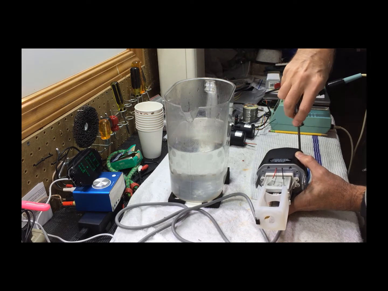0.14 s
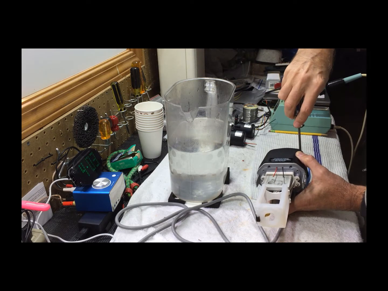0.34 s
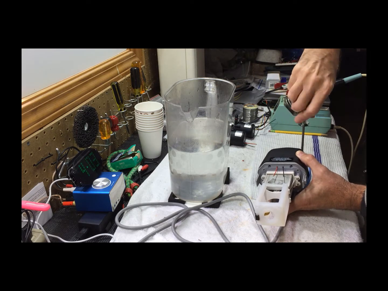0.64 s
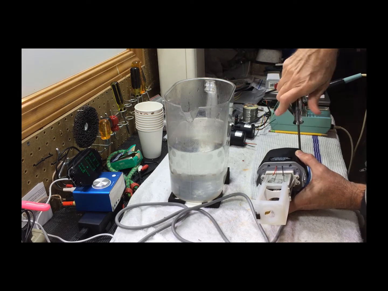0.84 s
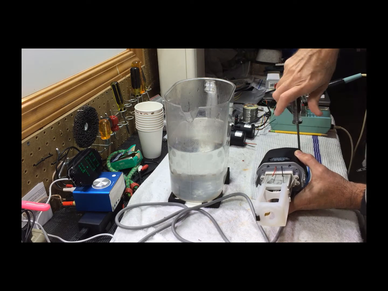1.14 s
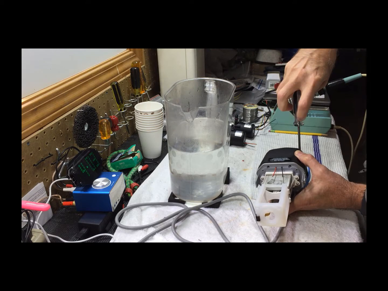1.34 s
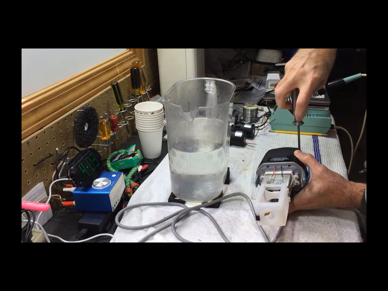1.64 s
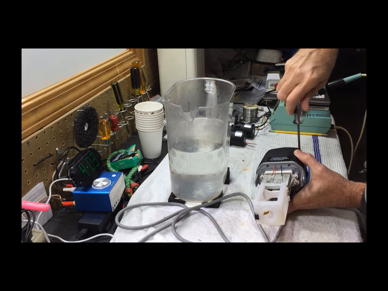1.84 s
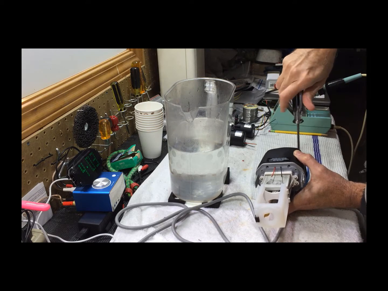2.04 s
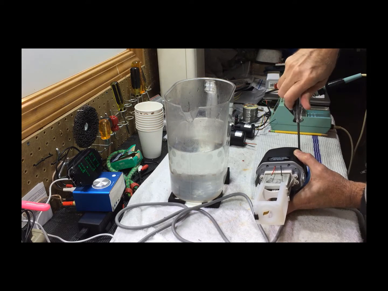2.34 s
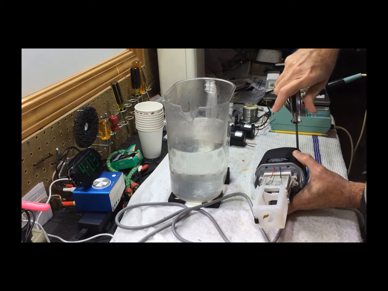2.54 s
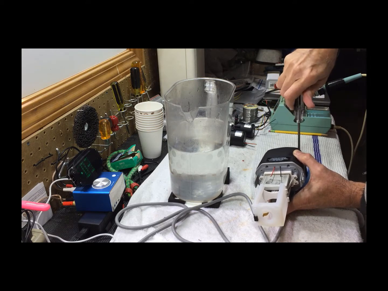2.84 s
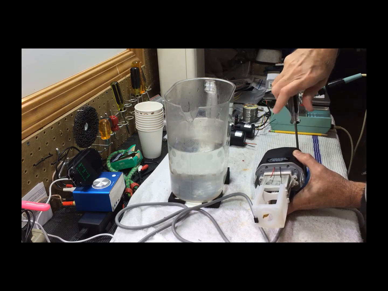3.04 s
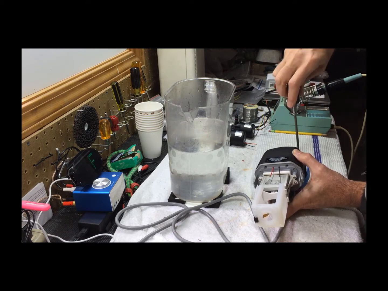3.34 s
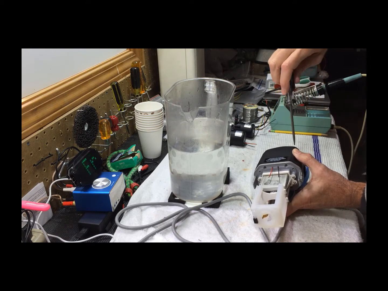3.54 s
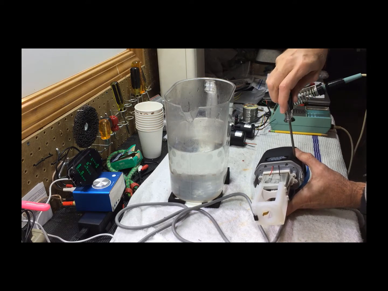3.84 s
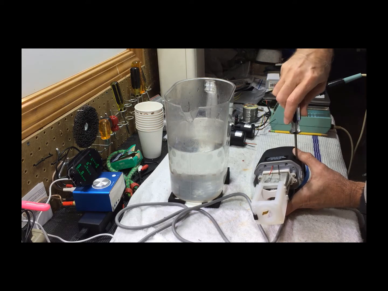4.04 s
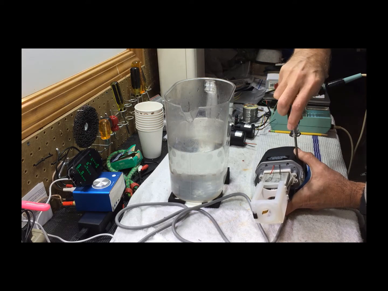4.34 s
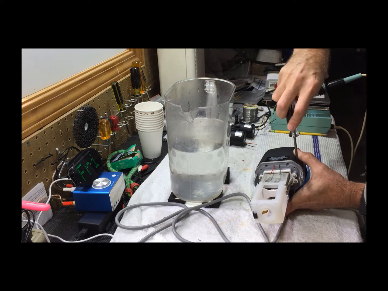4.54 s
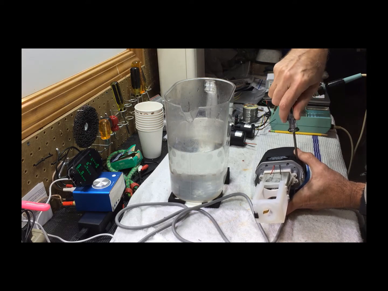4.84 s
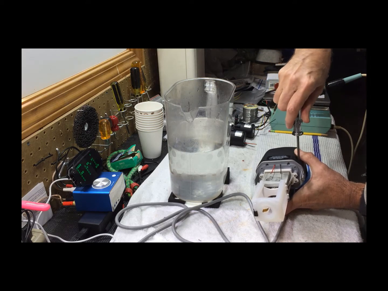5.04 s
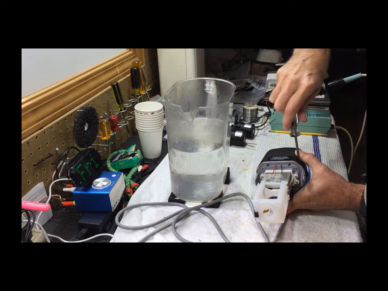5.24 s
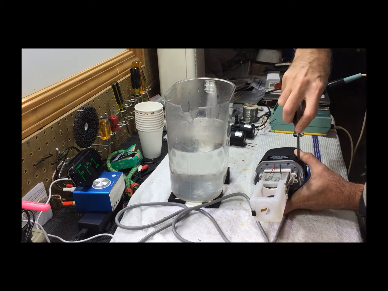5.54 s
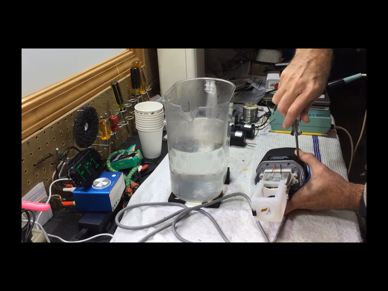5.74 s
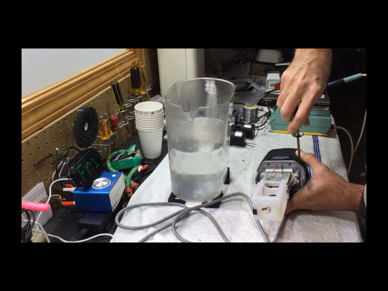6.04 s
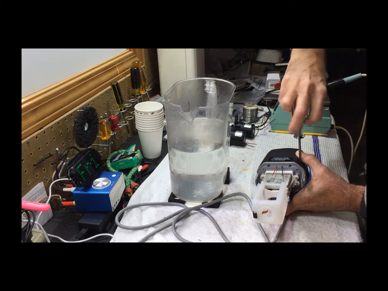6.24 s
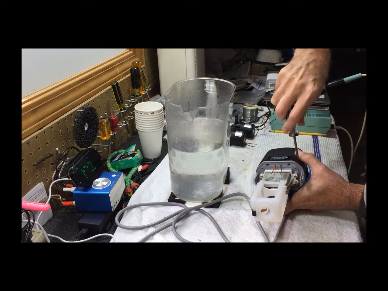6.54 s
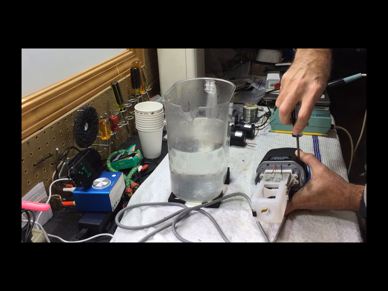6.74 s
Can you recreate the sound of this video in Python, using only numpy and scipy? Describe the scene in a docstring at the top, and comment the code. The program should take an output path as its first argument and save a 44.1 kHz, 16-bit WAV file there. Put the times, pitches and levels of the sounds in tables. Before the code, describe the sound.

A screwdriver backs screws out of a hollow plastic housing on a workbench. The blade knocks into the screw head, then ticks lightly in the slot while the thread grinds faintly in brief swells. Small sharp snaps and skids of the tip follow, then more knocks and hollow pops of the plastic. The sounds are close and fairly quiet, with a short room echo over faint hiss and hum.

```python
"""A long screwdriver backs screws out of a plastic housing on a cloth-covered workbench.
Over faint hiss and mains hum, the blade knocks home; contacts ring the hollow shell and steel shaft,
and the small workshop gives a short echo. From 0.6 s the thread grinds in brief swells and the blade
ticks in the slot. From 2.4 s come sharp snaps, then skids of the tip over the screw head.
From 4.2 s the knocks return, among hollow pops of the shell under the holding hand."""
import sys
import numpy as np
from scipy import signal
from scipy.fft import rfft, irfft
from scipy.io import wavfile

SR = 44100
rng = np.random.default_rng(int(sys.argv[2]) if len(sys.argv) > 2 else 0)


def log_audio(samples):
    """Write samples as a 16-bit WAV file to the path given in sys.argv[1]."""
    # one column per channel
    frames = np.atleast_2d(samples).T
    # limit to full scale, then quantise
    limited = np.clip(frames, -1, 1)
    pcm = np.round(limited * 32767).astype(np.int16)
    wavfile.write(sys.argv[1], SR, pcm)


N = 303408

# Rumble and hiss spectrum: freq_hz, density_rel_db
AIR_SPECTRUM = [(20, -32), (35, -15), (60, -3.5), (100, -4.5), (200, -8.5), (400, -11.5), (620, -13),
                (850, -17.5), (1150, -14), (2000, -17), (4000, -20.5), (8000, -25.5), (14500, -29.5),
                (16000, -52)]
# Rumble and hiss envelope: time_s, level_db
AIR_ENVELOPE = [(0, -67.5), (1, -71), (2.2, -68.5), (3.2, -68), (3.8, -68), (4.7, -67), (5.05, -64.5),
                (5.75, -70), (6.88, -68.5)]
# Housing and shaft modes: freq_hz, width_hz, gain_db
SHELL_MODES = [(501.5, 66, -8), (572, 22, -1), (629.6, 57, 2.5), (712.7, 34, -0.5), (899, 13, -9.5),
               (1063, 26, 2.5), (1192, 116, 1), (1406, 360, -7.5), (1541, 340, -3), (1666, 69, -0.5),
               (1875, 250, -3.5), (1957, 117, -3), (2320, 33, -28.5), (2680, 230, -2), (2958, 110, 0),
               (2900, 1500, -5), (3745, 210, -9), (4208, 260, -3.5), (4254, 120, -22), (5230, 46, -11),
               (5540, 87, -10.5), (6195, 130, -10), (6720, 97, -11.5), (8790, 820, -17), (11520, 370, -17),
               (13800, 480, -16)]

# Contacts, five kinds: start_s, level_rel_db, brightness_db, ring_hz, slip_s
BLADE_KNOCKS = [(.0002, -39, 2, 2120, 0.00165), (.028, -30, 3, 1674, 0.0017),
                (.3686, -25, 1.5, 1390, 0.00041), (4.2531, -35.5, -1.5, 1540, .0011),
                (4.4436, -44, -0.5, 1380, 0.0014), (4.4607, -41, -7, 1070, 0.0018),
                (5.0898, -27, 0.5, 1360, 0.00064), (5.2224, -32.5, -7, 1110, 0.001),
                (5.2689, -34, 2.5, 1600, 0.0029), (5.5237, -41.5, 0.5, 1400, 0.0014),
                (5.9999, -37, -2, 1590, 0.0024), (6.2894, -40, -3.5, 1800, .00054),
                (6.3014, -42.5, 1, 1330, 0.006), (6.5378, -47.5, -41, 990, 0.0026),
                (6.767, -41, -0.5, 1630, 0.0013)]  # blade drops home in the screw head
SHELL_POPS = [(.342, -33, 1, 1230, 0.0014), (.3505, -35.5, -2, 1240, .0026),
              (.6008, -37.5, 0, 880, 0.00071), (.64, -54, 3, 980, 0.0027), (1.1679, -45, -1, 630, 0.0011),
              (1.3225, -56.5, -2, 630, 0.001), (1.5966, -60, 7, 1160, .0017),
              (2.0208, -57, -2, 630, 0.0045), (3.014, -56, 5, 630, 0.0009), (3.3735, -46, 7.5, 624, 0.0024),
              (4.2359, -52, -6, 1200, 0.0032), (4.436, -36.5, -2, 1090, 0.0018),
              (4.9092, -52, -15, 620, 0.0021), (5.0765, -46.5, 0, 1110, 0.0016),
              (5.675, -55.5, -10, 630, 0.00098), (5.8298, -57, 10.5, 1480, 0.0063),
              (6.3485, -42, -22, 670, 0.0029), (6.5134, -47.5, -27, 1060, 0.0058),
              (6.6024, -55, -20, 1860, 0.00044)]  # shell gives under the hand
TIP_SKIDS = [(.365, -47.5, 8.5, 2830, 0.00028), (2.7234, -56.5, -6, 1830, .0048),
             (2.756, -50.5, -6.5, 1820, 0.00059), (2.7993, -45, 0.5, 2680, 0.0016),
             (2.9811, -50, -4, 1740, 0.0013), (3.0927, -51, -6, 1210, 0.0014),
             (3.1184, -52, 8, 2820, 0.011), (3.4235, -61, 9, 2380, .0085),
             (3.4401, -41.5, -2.5, 1710, 0.0014), (3.4615, -45.5, 3, 1660, .0015),
             (3.4758, -41.5, 2.5, 2740, 0.00035), (3.4923, -47, 1.5, 1590, 0.0029),
             (3.9738, -44.5, 0.5, 1700, 0.00096), (3.9847, -43, -4.5, 1400, 0.00059),
             (4.034, -53.5, -6, 1120, .0059), (4.0586, -47.5, -13, 1080, 0.0043),
             (4.0908, -50, -13, 1140, 0.0023), (4.1087, -39, -1.5, 1840, 0.0033),
             (4.1222, -45, -0.5, 2850, .0024), (5.2192, -44, 9, 1410, .0015),
             (5.9497, -41, 4.5, 1560, 0.0011)]  # tip skids over the head
RELEASE_SNAPS = [(.369, -45, 4.5, 9700, 0.00066), (.6182, -67, 7.5, 6260, 0.0014),
                 (.6261, -61, 7.5, 2000, 0.00074), (2.4333, -55, 2.5, 12500, 0.00093),
                 (2.5783, -44, -8.5, 13000, 0.00036), (2.5828, -55, 1.5, 13000, 0.0017),
                 (2.8398, -45, -9.5, 2110, 0.00097), (2.845, -52.5, 1.5, 13000, 0.0022),
                 (3.0046, -56, 1, 13600, 0.00084), (3.1257, -38.5, -6, 13000, 0.0003),
                 (3.1473, -58, 2.5, 12800, 0.0019), (3.2785, -56.5, 2, 13400, 0.00095),
                 (3.3713, -47.5, -4, 2000, 0.0019), (5.2712, -45, 10, 5100, .0003),
                 (6.3965, -63, 8.5, 4200, 0.00092)]  # thread or blade breaks loose
SLOT_TICKS = [(.7174, -56.5, -5, 1440, 0.0005), (.731, -56, -1, 1310, 0.00038),
              (.7927, -65.5, -20, 1250, 0.00038), (.9189, -66.5, -10, 1216, .001),
              (1.1646, -58.5, -1, 1850, 0.00094), (1.1991, -62, 7.5, 1800, 0.00049),
              (1.4006, -63, 1, 1420, 0.00096), (1.4734, -50, 1.5, 1960, 0.00035),
              (1.5753, -55, -6, 920, 0.0018), (1.699, -65.5, 1, 2570, .0013),
              (1.7683, -54.5, 6, 2040, 0.00028), (1.8534, -54, -1, 1990, 0.00026),
              (2.0059, -52.5, 4.5, 2710, 0.0012), (2.0446, -51.5, -0.5, 1720, 0.0012),
              (2.1473, -63, 1, 1770, 0.00065), (2.2942, -53, 6, 2880, 0.00095),
              (2.3105, -61.5, 5, 2740, 0.0018), (2.4878, -51.5, -3, 1180, 0.00035),
              (2.5626, -55.5, 7.5, 2620, 0.0016), (3.2494, -50.5, 7.5, 1690, 0.0049),
              (4.1939, -49, 0.5, 1090, 0.0027), (4.2068, -48.5, -2, 2010, 0.00041),
              (5.4304, -52, -8, 1450, 0.00044), (5.5845, -48, 3.5, 1380, 0.0018),
              (5.8645, -52.5, -4, 1820, 0.00085), (6.369, -55, -11, 1130, 0.0006),
              (6.4468, -56, -9, 1800, 0.00045)]  # blade meets the slot flanks on a new grip
# Balance per kind: hollow_db, clack_db, tick_db, crack_db, thud_db
KNOCK_MIX_DB = (-3, 1, -8, -19, -19)
POP_MIX_DB = (-1.5, -8.5, -15.5, -29.5, -21.5)
SKID_MIX_DB = (-18.5, -1, -4, -14, -11.5)
SNAP_MIX_DB = (1, 0, -4, 1, -11.5)
TICK_MIX_DB = (-1, 0.5, -6.5, -33, -31)
# Bounds of the hollow, clack, tick and crack registers: edge_hz
REGISTER_EDGES_HZ = [440, 850, 2300, 5800, 15500]
# Register gain per dB of brightness: hollow_db, clack_db, tick_db, crack_db
BRIGHTNESS_SLOPES = [-0.047, -0.11, 1.366, 1.42]

# Workshop response: freq_hz, early_db, tail_db, tail_t60_s
ROOM_RESPONSE = [(200, 2, -18, 0.22), (566, -10, -18.5, 0.63), (1550, -5, -14.5, 0.48),
                 (3560, -4, -13.5, 0.57), (7000, -13, -11, 0.13), (15000, -2, -16.5, 0.24)]
# Early echo decay, cloth absorbs treble first: freq_hz, t60_s
EARLY_DECAY = [(600, 0.15), (2000, 0.14), (10000, 0.089)]
# Thread rubs: centre_s, half_length_s, level_rel_db
THREAD_RUBS = [(0.623, 0.025, -58), (0.782, 0.083, -72), (2.019, 0.017, -63), (2.302, 0.015, -58),
               (2.431, 0.007, -53), (2.578, 0.023, -58.5), (2.817, 0.034, -59), (3.122, 0.033, -60.5),
               (3.283, 0.0098, -45.5), (3.345, 0.026, -63), (3.462, 0.033, -58), (4.082, 0.033, -61),
               (4.217, 0.05, -62.5), (4.446, 0.026, -56), (5.211, 0.011, -48.5), (5.952, 0.01, -54),
               (5.998, 0.014, -47.5), (6.306, 0.024, -58.5), (6.414, .035, -56.5), (6.534, 0.029, -57),
               (6.63, 0.021, -69.5)]
# Rub filter: freq_hz, gain_rel_db
RUB_SPECTRUM = [(250, 13.5), (600, -1.5), (1500, -4.5), (3000, -12), (6000, -1.5), (15000, -9)]


def from_db(db):
    """Decibels to gain."""
    return 10 ** (np.asarray(db) / 20)


def unit_energy(x):
    """Scale to a sum of squares of one."""
    return x / np.sqrt(np.sum(x ** 2) + 1e-30)


def at_hz(points, hz, column=1):
    """Interpolate a column over log frequency."""
    points = np.array(points)
    return np.interp(np.log(np.maximum(hz, 1)), np.log(points[:, 0]), points[:, column])


def band(x, low_hz, high_hz, order):
    """Causal band-pass."""
    return signal.sosfilt(signal.butter(order, [low_hz, high_hz], "band", fs=SR, output="sos"), x)


def coloured(x, spectrum):
    """Filter by a spectrum; rms 1."""
    gain = from_db(at_hz(spectrum, np.arange(N // 2 + 1) * SR / N))
    return unit_energy(irfft(rfft(x) * gain, N)) * np.sqrt(N)


def room_tone(hum_hz=59.6, hum_rms_db=-81):
    """Soft rumble and hiss with a trace of mains hum."""
    t = np.arange(N) / SR
    envelope = from_db(np.interp(t, *np.transpose(AIR_ENVELOPE)))
    air = envelope * coloured(rng.standard_normal(N), AIR_SPECTRUM)
    return air + from_db(hum_rms_db) * np.sqrt(2) * np.sin(2 * np.pi * hum_hz * t)


def grains(shape, rate_hz, spread_db):
    """Stick-slip jerks of random time, size and sign."""
    sizes = from_db(spread_db * np.minimum(rng.exponential(1, shape), 4)) * rng.choice([-1, 1], shape)
    return sizes * (rng.random(shape) < rate_hz / SR)


def shell(force, ring_hz, focus_db, spread_db, reach_oct=0.23):
    """Each force row drives the modes at its own spot, favouring those near ring_hz."""
    out = np.zeros_like(force)
    spots = (len(force), 1)
    for hz, width_hz, gain_db in SHELL_MODES:
        r = np.exp(-np.pi * width_hz / SR)
        mode = [1, 0, -1, 1, -2 * r * np.cos(2 * np.pi * hz / SR), r * r]
        skirt = signal.butter(1, [hz * .72, min(hz / .72, 20000)], "band", fs=SR, output="sos")[0]
        favour_db = focus_db * np.exp(-(np.log2(hz / ring_hz) / reach_oct) ** 2)
        scatter_db = spread_db * rng.standard_normal(spots)
        weight = from_db(gain_db + favour_db + scatter_db) * rng.choice([-1, 1], spots)
        out += (1 - r * r) / 2 * weight * signal.sosfilt([mode, skirt], force + 1e-18)
    return out


def contact_rows():
    """All contacts: start_s, hollow_db, clack_db, tick_db, crack_db, thud_db, ring_hz, slip_s."""
    kinds = [(BLADE_KNOCKS, KNOCK_MIX_DB), (SLOT_TICKS, TICK_MIX_DB), (RELEASE_SNAPS, SNAP_MIX_DB),
             (TIP_SKIDS, SKID_MIX_DB), (SHELL_POPS, POP_MIX_DB)]
    rows = []
    for table, (*mix_db, thud_db) in kinds:
        for start_s, level_db, brightness_db, ring_hz, slip_s in table:
            registers_db = level_db + np.array(mix_db) + brightness_db * np.array(BRIGHTNESS_SLOPES)
            rows.append([start_s, *registers_db, level_db + thud_db, ring_hz, slip_s])
    return np.array(rows)


def contacts(rows, gain_db=-0.5, slip_db=-14.5, rattle_db=-8.5, rattle_s=0.0028):
    """A sharp catch and a short slip ring the shell; levels are set per register."""
    t = np.arange(SR // 14) / SR
    ring_hz, slip_s = rows[:, -2:-1], np.maximum(rows[:, -1:], 4e-4)
    friction = t / slip_s * np.exp(1 - 1.09 * t / slip_s)
    force = from_db(slip_db) * grains(friction.shape, rate_hz=3600, spread_db=3.5) * friction
    force[:, 0] += .6  # catch
    rings = shell(force, ring_hz, focus_db=9.0, spread_db=1.0)
    # Many weak modes blur into a brief, grainy rattle.
    rattles = grains(rings.shape, rate_hz=13000, spread_db=8.0) * np.exp(-t / (rattle_s + slip_s / 2))
    rattles *= 1 - np.exp(-t / slip_s)
    rattles = signal.lfilter([1], [1, -.85], rattles)
    # Less crack against tick: softer contact, lower cutoff.
    hardness_db = rows[:, 4] - rows[:, 3] + 30
    cutoffs_hz = np.clip(2400 * 2 ** (hardness_db / 16), 1800, 19000)
    for k, cutoff_hz in enumerate(cutoffs_hz):
        lowpass = signal.butter(2, cutoff_hz, fs=SR)
        rings[k], rattles[k] = signal.lfilter(*lowpass, [rings[k], rattles[k] + 1e-18])
    hits = np.zeros_like(rings)
    level_samples = SR // 100  # level = rms with the energy spread over 10 ms
    for k, (low_hz, high_hz) in enumerate(zip(REGISTER_EDGES_HZ, REGISTER_EDGES_HZ[1:])):
        ring_band = band(rings, low_hz, high_hz, order=4)
        rattle_band = band(rattles, max(low_hz, 540), high_hz, order=3)
        for hit, ring, rattle, level_db in zip(hits, ring_band, rattle_band, rows[:, k + 1]):
            blend = unit_energy(ring) + from_db(rattle_db) * unit_energy(rattle)
            hit += from_db(level_db + gain_db) * unit_energy(blend) * np.sqrt(level_samples)
    out = np.zeros(N + len(t))
    for start_s, hit in zip(rows[:, 0], hits):
        start = int(start_s * SR)
        out[start:start + len(t)] += hit
    return out[:N]


def housing_thuds(rows, pitch_hz=328, t60_s=0.069):
    """Each push rocks the housing, which thuds through the cloth."""
    start_s, thud_db = rows[:, 0], rows[:, 5]
    pushes = np.zeros(N)
    pushes[(start_s * SR).astype(int)] = from_db(thud_db)
    r, w = from_db(-60 / (t60_s * SR)), 2 * np.pi * pitch_hz / SR
    return signal.lfilter([0, np.sin(w)], [1, -2 * r * np.cos(w), r * r], pushes + 1e-18)


def workshop_echo(x, first_echo_s=0.0015, build_up_s=0.0016):
    """Bench clutter scatters early echoes; the walls return a diffuse tail."""
    t = np.arange(SR // 4) / SR
    edges_hz = np.geomspace(170, 17000, 18)
    white = rng.standard_normal((2, N))
    arrival = np.clip(t / first_echo_s - 1, 0, 1)
    early, tail = np.zeros(len(t)), np.zeros(N)
    build_up = np.exp(-1 / (build_up_s * SR))
    for k, (low_hz, high_hz) in enumerate(zip(edges_hz, edges_hz[1:])):
        hz = np.sqrt(low_hz * high_hz)
        early_db, tail_db, tail_t60_s = (at_hz(ROOM_RESPONSE, hz, column) for column in (1, 2, 3))
        noise = band(white[k % 2], low_hz, high_hz, order=3)
        band_share = np.sqrt(2 * (high_hz - low_hz) / SR)
        echoes = noise[-len(t):] * arrival * from_db(-60 * t / at_hz(EARLY_DECAY, hz))
        early += band_share * from_db(early_db) * unit_energy(echoes)
        # The room stores band energy and leaks it.
        power = band(x + 1e-12, low_hz, high_hz, order=3) ** 2
        retention = from_db(-120 / (tail_t60_s * SR))
        stored = signal.lfilter([1 - retention], [1, -retention], power)
        stored = signal.lfilter([1 - build_up], [1, -build_up], stored)
        tail += from_db(tail_db) * np.sqrt(stored * N) * unit_energy(noise)
    return signal.fftconvolve(x, early)[:N] + tail


def thread_grind(gain_db=3.5):
    """The thread grinds in the plastic: grains ring the shell, swelling with each twist."""
    t = np.arange(N) / SR
    pressure = sum(from_db(level_db + gain_db) * np.exp(-((t - centre_s) / half_length_s) ** 2)
                   for centre_s, half_length_s, level_db in THREAD_RUBS)
    jerks = grains((1, N), rate_hz=460, spread_db=-2.0)
    grit = shell(jerks, ring_hz=1830, focus_db=5.5, spread_db=-5.5)[0]
    return pressure * coloured(grit, RUB_SPECTRUM)


def scene():
    """Work, echo and room tone; mono."""
    rows = contact_rows()
    work = contacts(rows) + housing_thuds(rows) + thread_grind()
    return (work + workshop_echo(work) + room_tone())[None]


def record(dry):
    """Steep low-pass at 15.9 kHz."""
    return signal.sosfilt(signal.ellip(10, .1, 80, 15900, fs=SR, output="sos"), dry)


dry = scene()
out = record(dry)
log_audio(out)
```